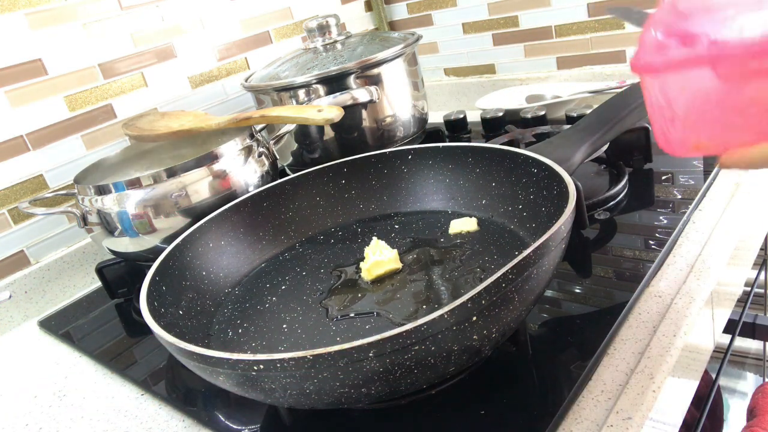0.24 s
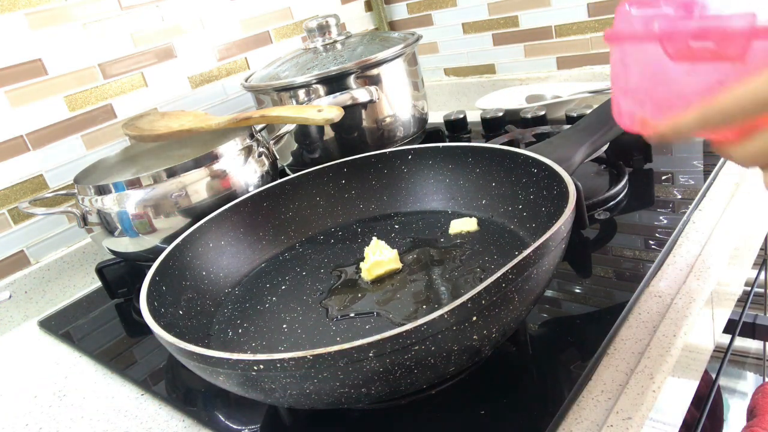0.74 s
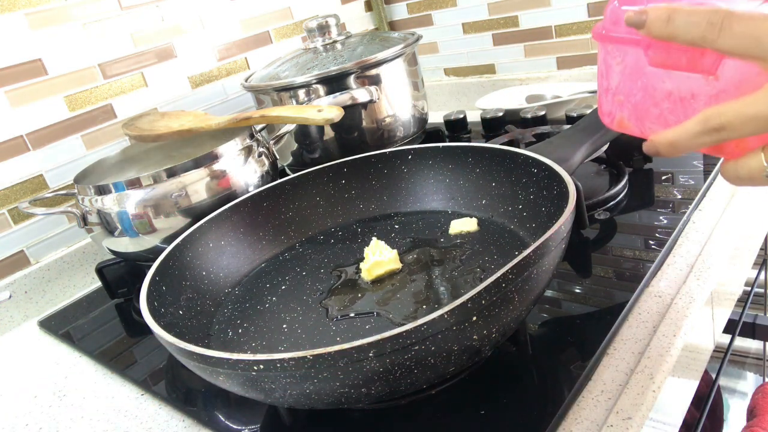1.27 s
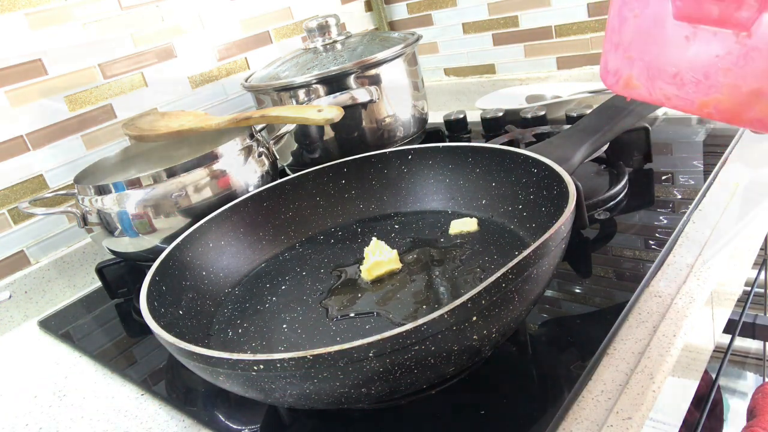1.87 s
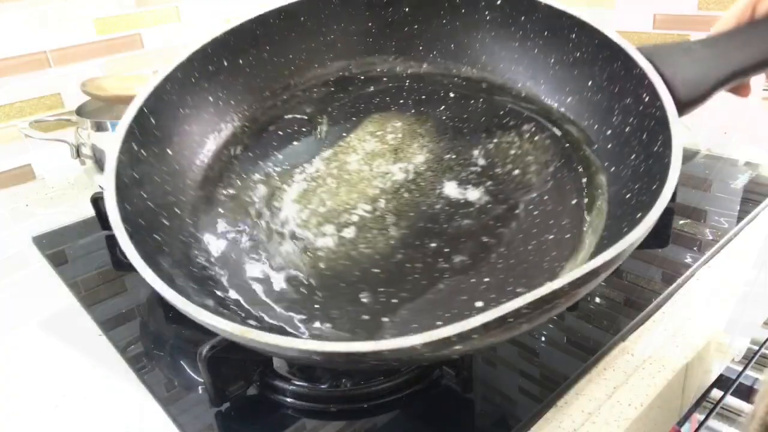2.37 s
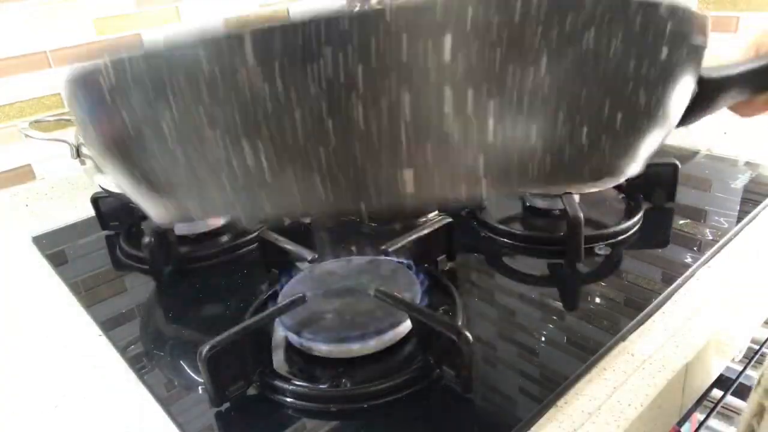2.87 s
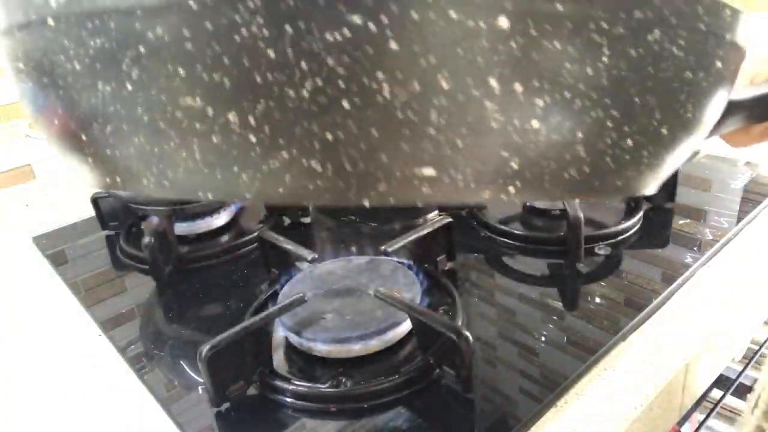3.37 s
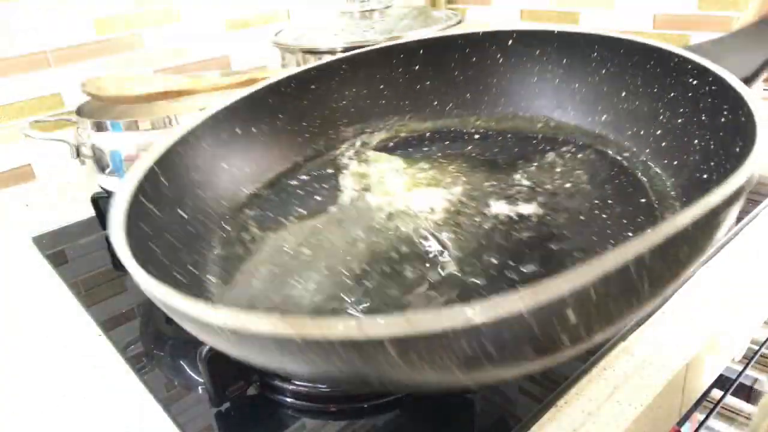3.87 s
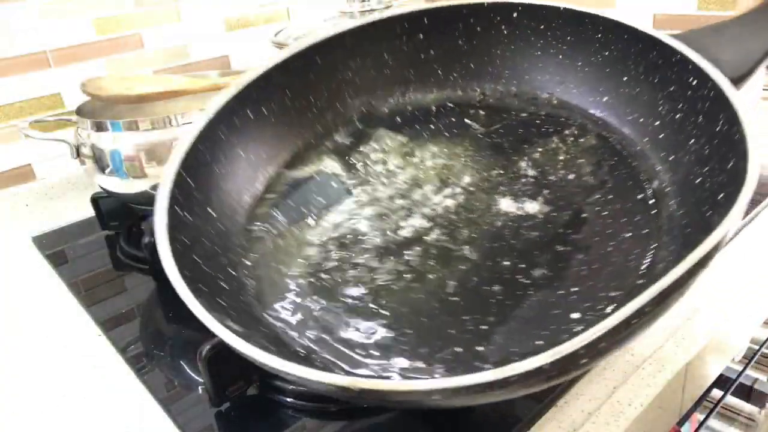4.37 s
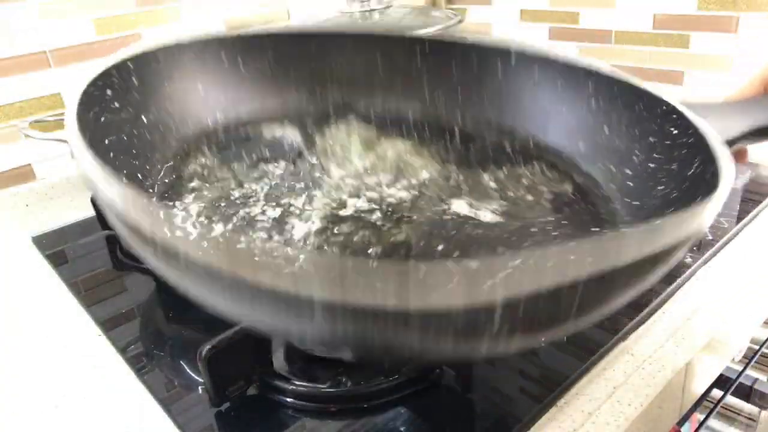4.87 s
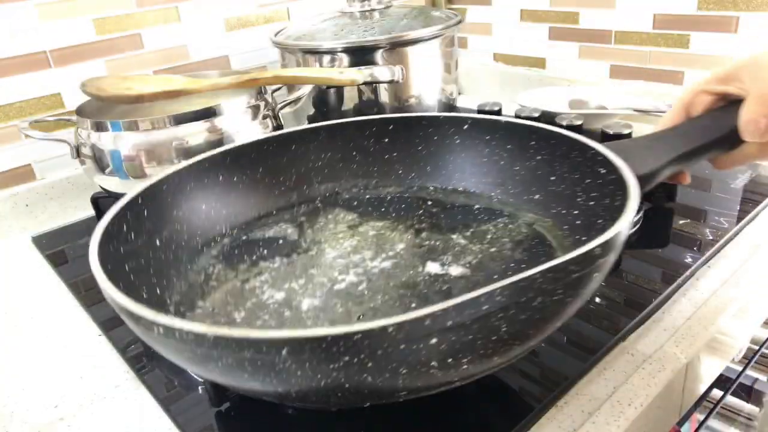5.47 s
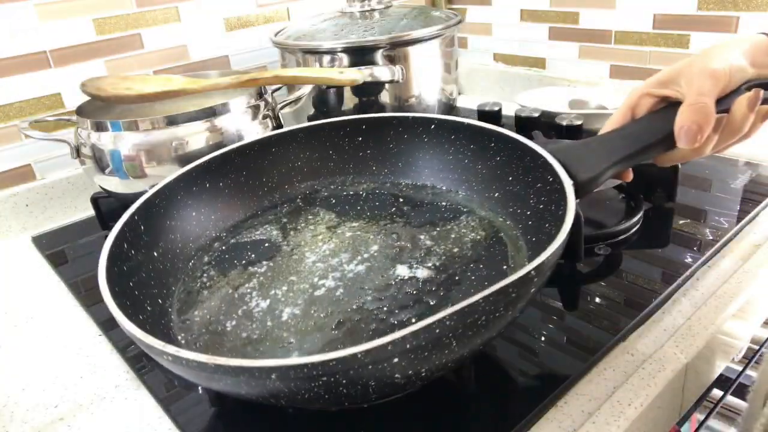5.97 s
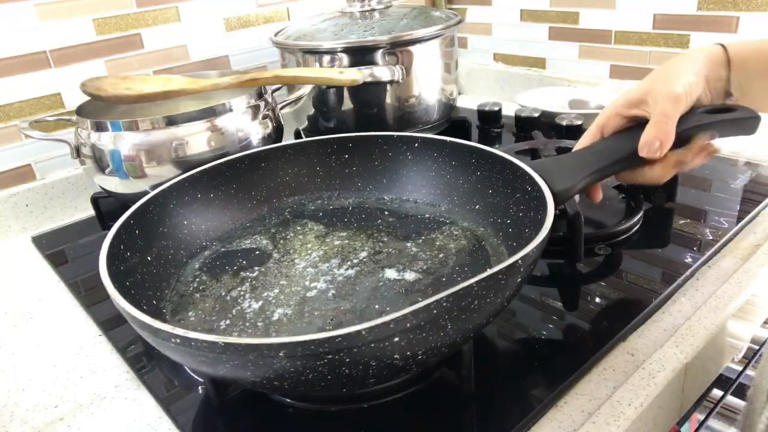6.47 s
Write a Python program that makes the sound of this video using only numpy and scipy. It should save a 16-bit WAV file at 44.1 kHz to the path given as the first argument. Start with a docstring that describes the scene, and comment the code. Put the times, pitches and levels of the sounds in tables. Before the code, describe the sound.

Close microphone at a home hob with short bright tile reflections. Quiet steady gas hiss and low flame flutter lie beneath everything. First come hollow plastic knocks, a click, and a hard lid snap with a brief jolt. Then a quieter stretch of fine butter sizzle, occasional sharp spits and muffled handle bumps. Finally a heavy pan strikes the iron grate, rings briefly and clatters through several smaller contacts.

```python
"""A frying pan with a knob of butter stands over a hissing gas burner in a small tiled kitchen.
A plastic tub is knocked, clicked and snapped shut beside it. Then the pan is lifted and swirled,
the melting butter sizzles faintly and spits, and the pan clatters back onto the iron grate."""
import sys
import numpy as np
from scipy import signal
from scipy.fft import rfft, irfft
from scipy.io import wavfile
from scipy.ndimage import uniform_filter1d, minimum_filter1d

SR = 44100
rng = np.random.default_rng(int(sys.argv[2]) if len(sys.argv) > 2 else 0)


def int16_out(signal):
    """Quantize to a 16-bit WAV file."""
    q = np.round(np.clip(np.atleast_2d(signal).T, -1, 1) * 32767)
    wavfile.write(sys.argv[1], SR, q.astype(np.int16))


N = 296352

# clicks and snaps of the tub's lid: (s, dB, pitch of the contact Hz, fall away from that pitch dB per octave)
TUB_HITS = [(0.813, -4.5, 3700, 14), (0.8195, -7.5, 3650, 12), (0.8224, -15.5, 780, 17),
            (1.1684, -8, 3500, 7), (1.170, 7, 7100, 3.2), (1.1725, 3, 1790, 2), (1.175, 2.5, 250, 4)]
# the lid's damped resonances: (Hz, width Hz, dB)
TUB = [(265, 19, 15), (305, 59, 32), (550, 140, 27.5), (854, 130, 23), (960, 150, 29), (1300, 320, 27.5), (1704, 120, 24),
       (2860, 1150, 18), (3560, 460, 15), (5660, 730, 15), (7280, 1000, 16.5), (12700, 7600, 9)]
# the pan lands and rocks on the grate: (s, pan ring dB, grate dB, pitch of the contact Hz)
LANDINGS = [(5.994, 0.1, 4, 9000), (6.008, -26, -8, 1600), (6.136, -18.5, -10, 1800), (6.149, -13.5, -11.5, 1800), (6.171, -39, -8, 300), (6.181, -20, -7, 990),
            (6.2145, -12.5, 5, 2930), (6.260, -42, -5, 695), (6.3281, -31, -7, 4370), (6.351, -38, -9, 500),
            (6.3635, -18, 6, 7500), (6.476, -50, -13.5, 403), (6.487, -42, -10, 810)]
# the pan's modes, the main ones first: (Hz, width Hz, dB)
PAN = [(113, 4, 36), (702, 8, 36), (2110, 13, 38), (2499, 14, 42), (3103, 13, 46.5),   # fixed
       (182, 14, 28), (226, 12, 28), (1061, 22, 24), (1315, 26, 30), (2010, 22, 24), (2222, 22, 27), (2278, 18, 27), (2340, 22, 25), (3187, 20, 27),
       (3553, 22, 29), (3688, 24, 24), (4335, 25, 24), (4700, 45, 25), (5432, 20, 25), (5770, 80, 33), (5900, 90, 31), (6240, 40, 27), (7290, 45, 25), (9020, 50, 16)]
# the iron grate and hob: (Hz, width Hz, dB)
GRATE = [(112.8, 4.8, 43), (197, 26, 34), (308, 72, 25.5), (387, 100, 23.5), (583, 190, 22.5), (705, 14.3, 36), (856, 240, 20), (1040, 90, 26.5), (1312, 81, 32),
         (1730, 290, 23.5), (2080, 130, 32), (2570, 93, 19), (2680, 16, 29.5), (3250, 190, 24), (3775, 98, 25), (4300, 84, 25.5),
         (4720, 105, 29), (5450, 64, 13), (5750, 67, -1), (6070, 300, 20), (7480, 270, 11.5), (9000, 350, 7.5), (13900, 7200, 1)]
# the loudest specks of water bursting in the fat: (s, peak dB, pitch Hz)
SPITS = [(3.208, -43, 5000), (3.605, -38, 5040), (3.883, -28, 5630), (3.966, -37, 6570), (4.028, -37, 9000),
         (4.502, -40, 12000), (4.664, -36.5, 5400), (5.469, -37, 12000), (5.550, -35, 11000)]
# the gas jet rings in the burner: (Hz, width Hz, dB with the pan seated, tilted, raised)
BURNER = [(1042, 180, -3.5, -9.5, -9), (1342, 204, 1, -5.5, 4.5), (1951, 273, -5, -3.5, -4), (3260, 400, -25, -23, -13.5), (4030, 500, -18.5, -17.5, -11),
          (4545, 135, -7.5, -16.5, -10), (6680, 440, -17.5, -17.5, -15), (7090, 270, -9.5, -11, -15), (8280, 380, -18.5, -26, -25), (9330, 430, -13.5, -24, -15.5),
          (11100, 310, -23, -36, -31), (11750, 210, -14.5, -25, -18), (12180, 570, -16.5, -38, -13), (14300, 720, -21, -27, -27)]
# (Hz, dB per Hz)
JET = [(100, -38), (170, -5), (300, -7), (500, -11), (800, -10.5), (1600, -12.5), (2300, -12), (2900, -25), (5000, -28.5), (6000, -28.5), (10000, -30), (15500, -40)]
FLAME = [(15, -39), (27, -47), (36, -11.5), (45, 5.5), (60, -6.5), (75, -11), (88, -1), (115, -7), (150, -22.5), (300, -55)]
SIZZLE = [(1500, -4), (2600, -2), (3500, -0.5), (5000, 0), (6100, -8), (8500, -5), (10200, -13.5), (12500, -7), (13500, -12), (15500, -12.5)]
# (s, gas hiss dB)
GAS = [(0, -44.5), (3.2, -45.5), (3.7, -46.5), (4.6, -46.5), (5.35, -48), (5.9, -47)]
# the pan is swirled twice: (s, where it is: 0 seated, 1 tilted, 2 raised)
LIFT = [(1.85, 0.055), (2.45, 0.59), (2.8, 1.7), (3.3, 1.6), (3.7, 0.55), (4.75, 0.86), (5.1, 1.52), (6.0, 1.67)]
# (Hz, t60 s)
KITCHEN = [(150, 0.48), (400, 0.54), (1000, 0.24), (2800, 0.35), (7000, 0.29), (14000, 0.13)]
# (Hz, dB of the reflections)
WALLS = [(100, -29.5), (250, -2), (1000, -9.5), (3500, -13), (8000, -18), (14000, -16)]
CUTOFF_HZ = 15900   # fixed
T = np.arange(N) / SR
# dull knocks on the tub: (s, dB, length of the touch s)
KNOCKS = [(0.1326, -17, 0.0017), (0.1354, -4.5, 0.0011), (0.139, -9.5, 0.0043), (0.146, -17, 0.0034),
          (0.273, -28.5, 0.011), (0.369, -26, 0.012), (1.299, -21.5, 0.0065)]
# their hollow resonances: (Hz, width Hz, dB)
HOLLOW = [(224, 51, 35.5), (334, 128, 31), (746, 102, 37.5), (1094, 110, 22.5), (1227, 38, 28.5), (1800, 280, 23.5), (2600, 410, 15.5), (3830, 400, 12), (5400, 2400, 6)]
SETTLING = 6   # the grate's damping of the ring grows by this much a second  # fixed
CONTACT_FALL_DB_PER_OCT = 3   # a blow on the grate weakens away from its pitch
# after each landing the grate takes the weight with a dull thud, in step with the blow
THUD_AFTER_S, THUD_DB, THUD_HZ, THUD_FALL_DB_PER_OCT = .014, -6.5, 294, 5
SPITTING_FROM_S, SPITTING_TO_S = 3.1, 6.3   # the fat is hot enough to spit
# levels with the pan seated, tilted, raised (dB)
FLAME_DB = [-49.5, -46.5, -47.5]
SIZZLE_DB = [-56, -55.5, -54.5]
WAVER_DB = [1.0, 1.8, 1.8]   # spread of the burner's resonances  # fixed
FLUTTER_DB, FLUTTER_PER_S = -0.3, 4.4   # the flame flutters at random
DIP_AT_S, DIP_WIDTH_S, DIP_DB = 2.19, 0.44, 3.5   # the level of the steady sounds dips briefly
HANDLING_FROM_S, HANDLING_TO_S = 2.7, 6.8   # the pan is swirled in the hand
# the hand shifts on the pan's handle: (s, dB, length of the touch s)
GRIPS = [(2.86, 0.5, 0.022), (3.045, -1.5, 0.01), (3.626, -2, 0.013), (4.2832, -4, 0.0035), (5.274, -6, 0.006)]
GRIP_HZ, GRIP_FALL_DB_PER_OCT = 1000, 5   # a broad, dead bump
TICK_DB, TICK_HZ, TICK_FOLLOWS = -17, 9000, 0.66   # metal meeting iron ticks; share of the ring's swing in dB
ECHO_S = [.0031, 0.003765, .0044]   # delay of the hiss's reflection off the pan: seated, tilted, raised
ECHO_DB = -16


def from_db(db):
    """Decibels to gain."""
    return 10 ** (np.asarray(db) / 20)


def rms_one(x):
    """Scale to rms 1."""
    return x / np.sqrt(np.mean(x ** 2) + 1e-20)


def in_time(rows):
    """A curve at every sample."""
    return np.interp(T, *np.transpose(rows))


def at_hz(points, hz):
    """Read a spectrum on a log-frequency axis."""
    f, value = np.transpose(points)
    return np.interp(np.log(np.maximum(hz, 1)), np.log(f), value)


def coloured(x, spectrum):
    """Give a steady sound a spectrum."""
    return irfft(rfft(x) * from_db(at_hz(spectrum, np.arange(N // 2 + 1) * SR / N)), N)


def drift(rate):
    """Slow chance of spread 1."""
    knots = rng.standard_normal(int(N / SR * rate) + 2)
    return np.interp(T * rate, np.arange(len(knots)), knots)


def resonate(x, hz, width):
    """One resonance, gain 1 on top."""
    r = np.exp(-np.pi * width / SR)
    return signal.lfilter(np.array([1, 0, -1]) * (1 - r * r) / 2, [1, -2 * r * np.cos(2 * np.pi * hz / SR), r * r], x + 1e-18)


def add(out, s, sound):
    """Mix a sound in at a time."""
    start = int(s * SR)
    out[start:start + len(sound)] += sound[:N - start]


def contact(rough, decay_s, above_hz):
    """A unit click followed by a dying chatter of tiny touches, with half a second to ring out."""
    t = T[:SR // 2]
    chatter = rng.standard_normal(len(t)) * np.exp(-np.minimum(t / decay_s, 20)) * np.sqrt(2 / (decay_s * SR))
    force = rough * signal.sosfilt(signal.butter(1, above_hz, "high", fs=SR, output="sos"), chatter)
    force[0] += 1
    return force / np.sqrt(1 + rough ** 2)


def struck(force, modes, alternate=False):
    """A blow rings all modes of a body; in bending metal, neighbours swing in opposite senses."""
    return sum((-1) ** (k * alternate) * from_db(db) * resonate(force, hz, width) for k, (hz, width, db) in enumerate(modes))


def tub(jolt_db, jolt_s, jolt_hz, jolt_fall_db):
    """Thin plastic: each snap buckles briefly and dies within milliseconds; the last one jolts the contents."""
    out = np.zeros(N)
    for s, *blow in TUB_HITS:
        add(out, s, struck(weighted(contact(rough=0.72, decay_s=0.0037, above_hz=280), *blow), TUB))
    jolt = weighted(contact(rough=8.5, decay_s=jolt_s, above_hz=330), jolt_db, jolt_hz, jolt_fall_db)
    add(out, TUB_HITS[-1][0], soften(jolt, top_hz=9500))
    return signal.sosfilt(signal.butter(2, 150, "high", fs=SR, output="sos"), out)


def pan_on_grate(damping_per_s, mix_db):
    """Each landing ticks, rings the pan with a new mix of modes, rattles the grate and ends in a thud; settling damps the ring."""
    pan, on_grate, ticks = np.zeros((3, N))
    for s, ring_db, grate_db, contact_hz in LANDINGS:
        damping = 1 + damping_per_s * (s - LANDINGS[0][0])
        modes = [(hz, width * (damping if hz > 1500 else 1), db + mix_db * rng.standard_normal()) for hz, width, db in PAN]
        add(ticks, s, from_db(TICK_DB + TICK_FOLLOWS * ring_db) * contact(rough=1.2, decay_s=.002, above_hz=3000))
        add(pan, s, from_db(ring_db) * struck(contact(rough=0.1, decay_s=0.0029, above_hz=2400), modes, alternate=True))
        add(on_grate, s, weighted(contact(rough=2.3, decay_s=0.0082, above_hz=67), grate_db, contact_hz, CONTACT_FALL_DB_PER_OCT))
        add(on_grate, s + THUD_AFTER_S, weighted(contact(rough=2.06, decay_s=0.014, above_hz=71), grate_db + THUD_DB, THUD_HZ, THUD_FALL_DB_PER_OCT))
    ticks = signal.sosfilt(signal.butter(2, min(TICK_HZ, SR * .45), "high", fs=SR, output="sos"), ticks + 1e-18)
    return ticks + soften(pan, top_hz=8140) + soften(struck(on_grate, GRATE, alternate=True), top_hz=10700)


def burner():
    """The gas jet hisses through the burner's resonances, which waver more under the moving pan; the flame rumbles more as the pan rises."""
    waver_db = by_pose(WAVER_DB)
    hiss = coloured(rng.standard_normal(N), JET)
    for hz, width, *pose_db in BURNER:
        tone = resonate(resonate(rng.standard_normal(N), hz, width), hz, width)
        hiss += tone * from_db(by_pose(pose_db) + waver_db * drift(9))
    flame = rms_one(coloured(rng.standard_normal(N), FLAME))
    return from_db(in_time(GAS)) * rms_one(off_the_pan(hiss)) + from_db(by_pose(FLAME_DB) + FLUTTER_DB * drift(FLUTTER_PER_S)) * flame


def butter(per_s, spread_db):
    """Thousands of tiny bubbles burst in the foam, each a click of its own size; louder when the raised pan lets the fat run."""
    sizes = from_db(spread_db * np.minimum(rng.exponential(1, N), 6)) * rng.choice([-1, 1], N)
    bursts = sizes * (rng.random(N) < per_s / SR)
    return from_db(by_pose(SIZZLE_DB)) * rms_one(coloured(bursts, SIZZLE))


def spits(faint_db, count=60):
    """Larger bubbles crack sharply; fainter ones fall at random between them."""
    faint = zip(rng.uniform(SPITTING_FROM_S, SPITTING_TO_S, count), rng.normal(faint_db, 2.3, count), rng.uniform(4200, 14000, count))
    out = np.zeros(N)
    for s, db, hz in SPITS + list(faint):
        crack = resonate(contact(rough=3.6, decay_s=0.0018, above_hz=820), hz, 0.48 * hz)
        add(out, s, from_db(db) * crack / np.abs(crack).max())
    return out


def kitchen(x):
    """Dense reflections off the tiles, dying faster in the treble."""
    t, tail = T[:SR], 0
    edges = 70 * 2 ** np.arange(9.)   # fixed
    for low, high in zip(edges, edges[1:]):
        hz = np.sqrt(low * high)
        decay = from_db(-60 * t / at_hz(KITCHEN, hz)) * np.clip((t - .003) / 0.012, 0, 1)
        band = signal.sosfilt(signal.butter(2, [low, high], "band", fs=SR, output="sos"), rng.standard_normal(SR))
        tail = tail + from_db(at_hz(WALLS, hz)) * band * decay / np.sqrt(np.sum(decay ** 2))
    return signal.fftconvolve(x, tail)[:N]


def soften(x, top_hz):
    """Round off the treble."""
    return signal.sosfilt(signal.butter(2, min(top_hz, SR * .45), fs=SR, output="sos"), x)


def weighted(force, db, hz, fall_db_per_oct):
    """A blow is strongest at the pitch of its contact and weaker on both sides, with nothing sounding early (minimum phase)."""
    size = len(force)
    octaves = np.log2(np.clip(np.arange(size // 2 + 1) * SR / size, 250, 10000) / hz)   # fixed
    cepstrum = irfft(np.log(from_db(db - fall_db_per_oct * np.abs(octaves))))[:size // 2]
    cepstrum[1:] *= 2
    return irfft(rfft(force) * np.exp(rfft(cepstrum, size)))


def knocks(rough_per_s, rub_db):
    """Dull, hollow knocks; the longer the touch, the more it rubs."""
    force, rubbing = np.zeros((2, N))
    for s, db, touch_s in KNOCKS:
        rough = rough_per_s * touch_s
        touch = from_db(db) * contact(rough, touch_s, above_hz=87)
        add(force, s, touch)
        add(rubbing, s, touch * rough ** 2 / (1 + rough ** 2))
    rub = from_db(rub_db) * resonate(resonate(rubbing, 1100, 1800), 1100, 2600)
    return soften(struck(force, HOLLOW, alternate=True), top_hz=8800) + rub


def by_pose(values):
    """Blend the values for the seated, tilted and raised pan as it moves."""
    s, pose = np.transpose(LIFT)
    return np.interp(T, s, np.interp(pose, np.arange(len(values)), values))


def handle(faint_db, faint_touch_s, rough_per_s, count=4):
    """Soft bumps of the hand on the pan's handle, rougher the longer the touch; fainter ones fall at random while it is swirled."""
    faint = [(s, faint_db, faint_touch_s) for s in rng.uniform(HANDLING_FROM_S, HANDLING_TO_S, count)]
    out = np.zeros(N)
    for s, db, touch_s in GRIPS + faint:
        add(out, s, weighted(contact(rough=rough_per_s * touch_s, decay_s=touch_s, above_hz=120), db, GRIP_HZ, GRIP_FALL_DB_PER_OCT))
    return soften(out, top_hz=2400)


def off_the_pan(x):
    """The pan reflects the hiss; as it moves, the path changes and the colour drifts."""
    return x + from_db(ECHO_DB) * np.interp(T - by_pose(ECHO_S), T, x)


def scene():
    """Blows and spits sound in the room, over the steady burner and butter."""
    plastic = tub(jolt_db=17.5, jolt_s=0.037, jolt_hz=260, jolt_fall_db=1.5)
    metal = pan_on_grate(damping_per_s=SETTLING, mix_db=-0.6)
    dull = knocks(rough_per_s=230, rub_db=16) + handle(faint_db=-9, faint_touch_s=0.011, rough_per_s=260)
    fat = spits(faint_db=-44.5)
    room = kitchen(from_db(-1.5) * plastic + from_db(1.5) * metal + from_db(-3.5) * dull + fat)
    dip = from_db(-DIP_DB * np.exp(-((T - DIP_AT_S) / DIP_WIDTH_S) ** 2))
    steady = dip * (burner() + butter(per_s=7700, spread_db=2.5))
    return (plastic + metal + dull + fat + room + steady)[None]


def record(dry):
    """A fast limiter holds the loudest blows near 1.8 times full scale; the deepest bass and the top are cut."""
    allowed = 1 / np.maximum(np.abs(dry) / 1.8, 1)
    gain = uniform_filter1d(minimum_filter1d(allowed, size=45), size=45)
    limited = signal.sosfilt(signal.butter(4, 29, "high", fs=SR, output="sos"), dry * gain)   # fixed
    return signal.sosfilt(signal.ellip(10, .2, 70, CUTOFF_HZ, fs=SR, output="sos"), limited)   # fixed


dry = scene()
out = record(dry)
int16_out(out)
```